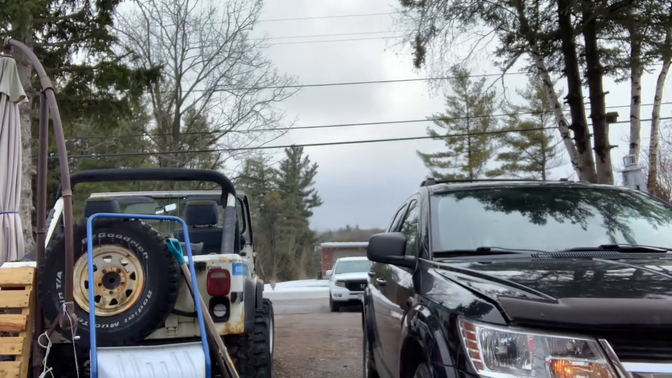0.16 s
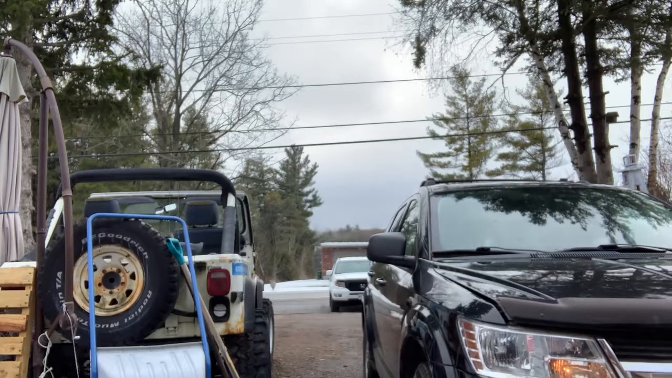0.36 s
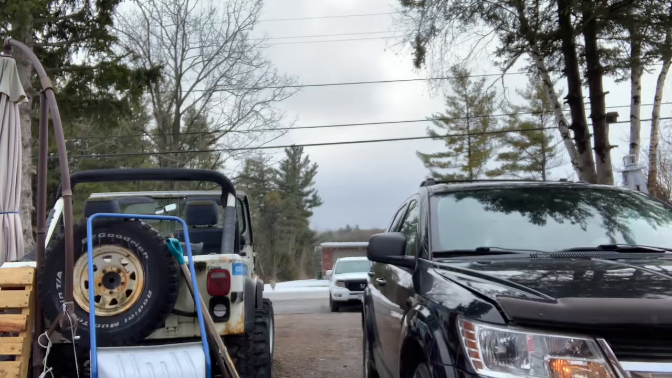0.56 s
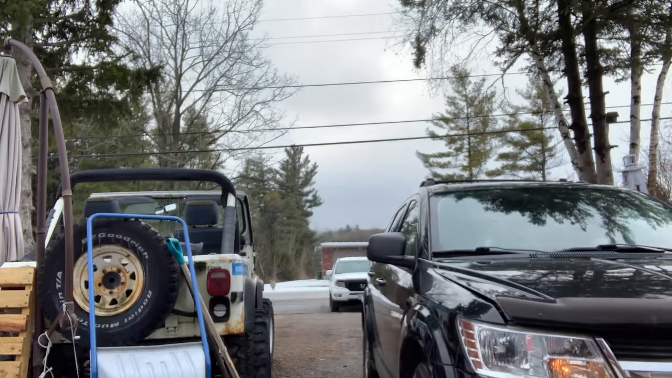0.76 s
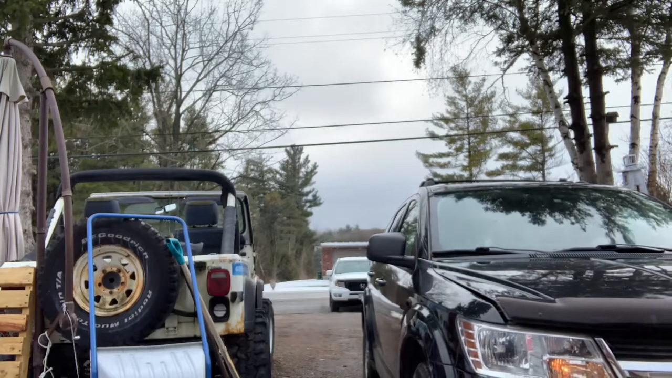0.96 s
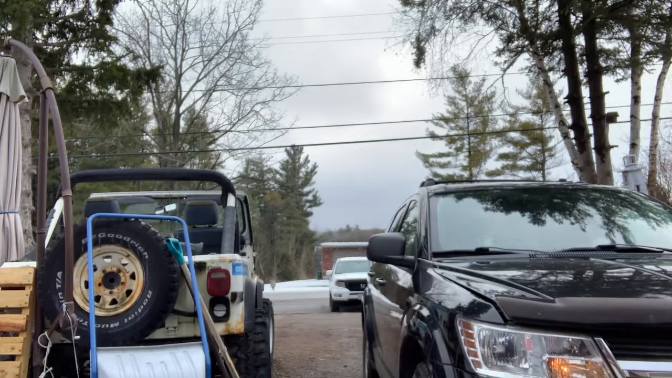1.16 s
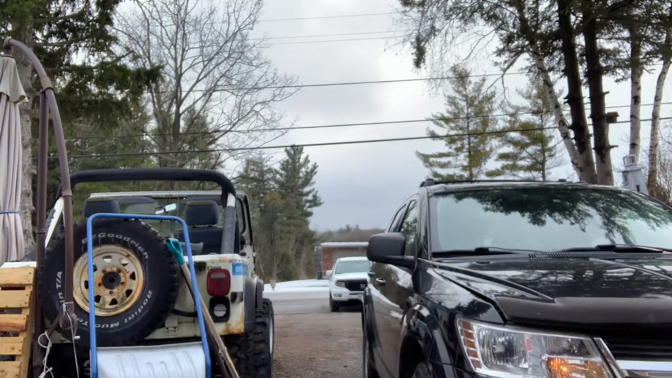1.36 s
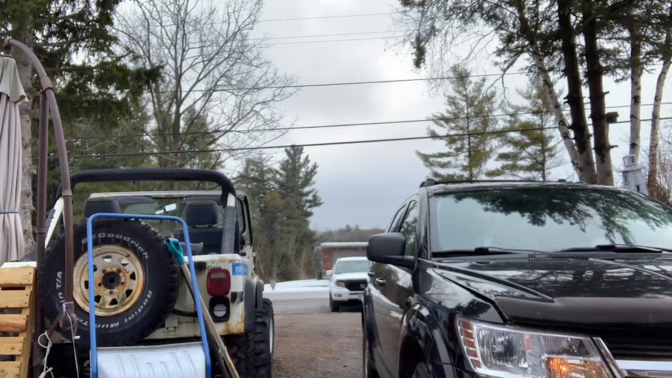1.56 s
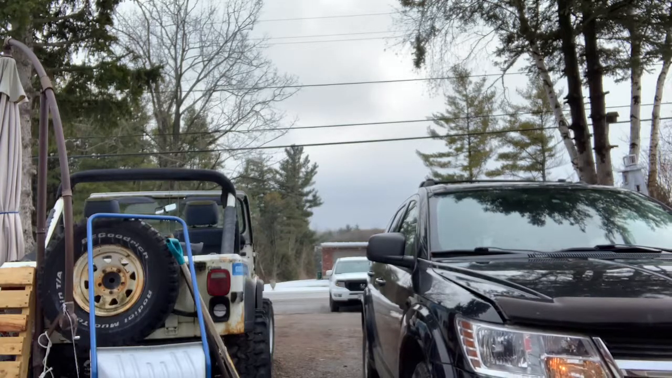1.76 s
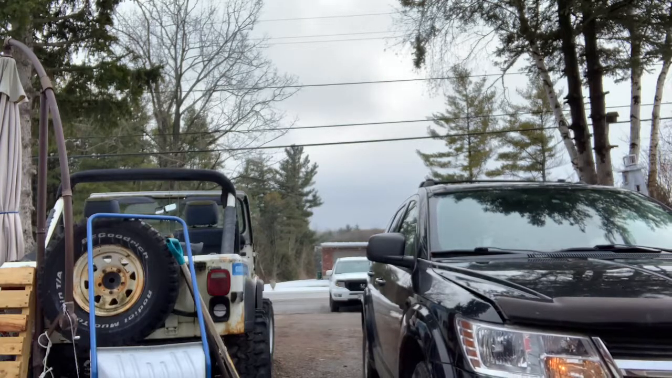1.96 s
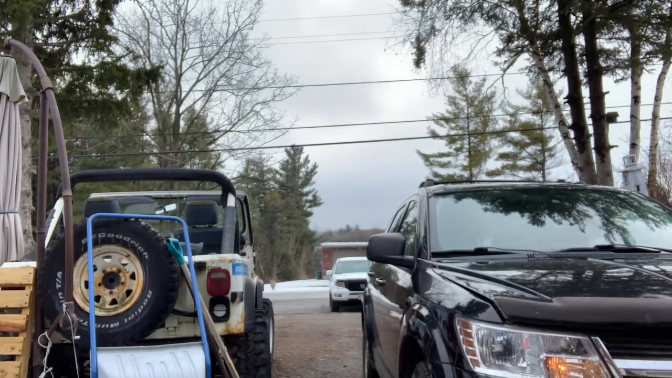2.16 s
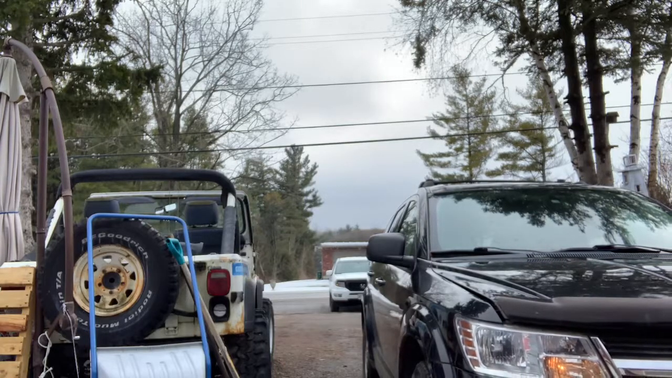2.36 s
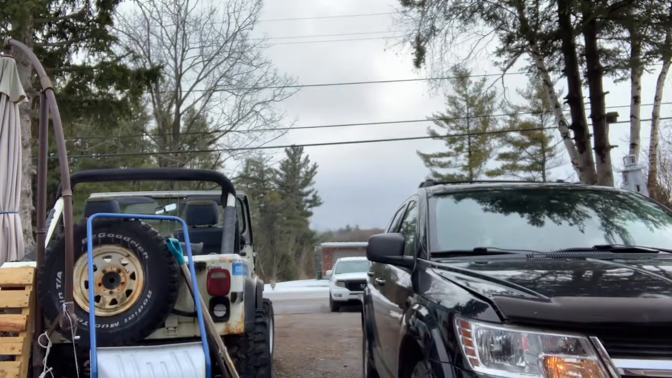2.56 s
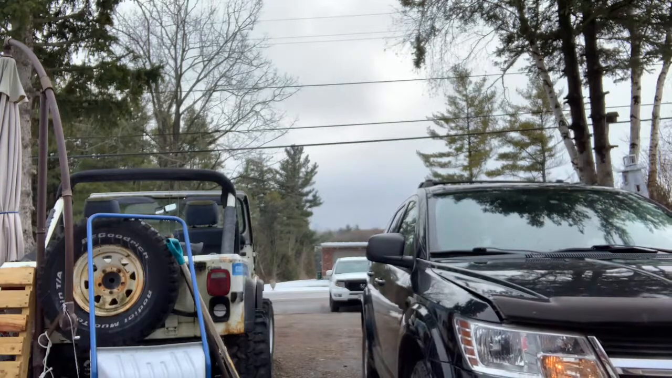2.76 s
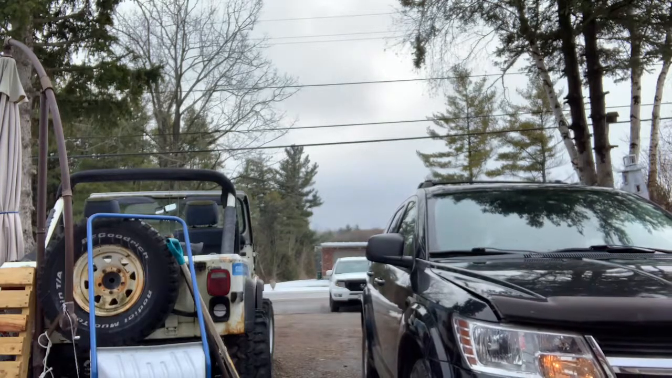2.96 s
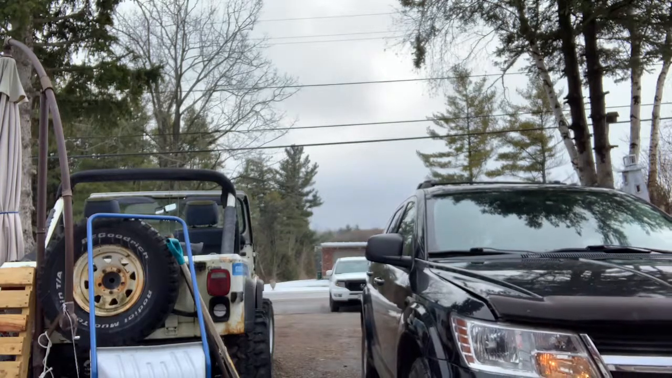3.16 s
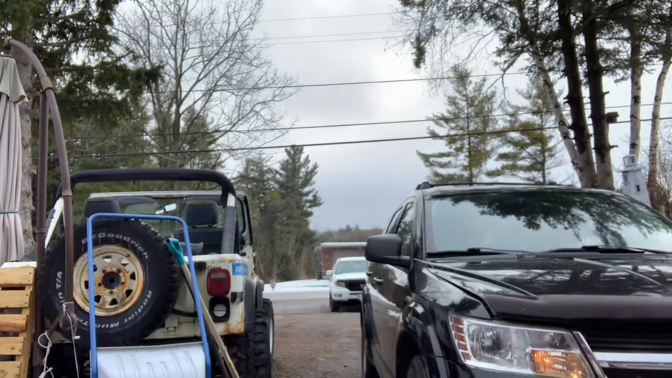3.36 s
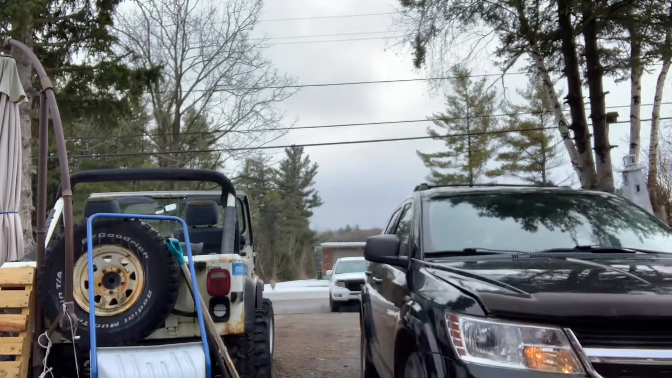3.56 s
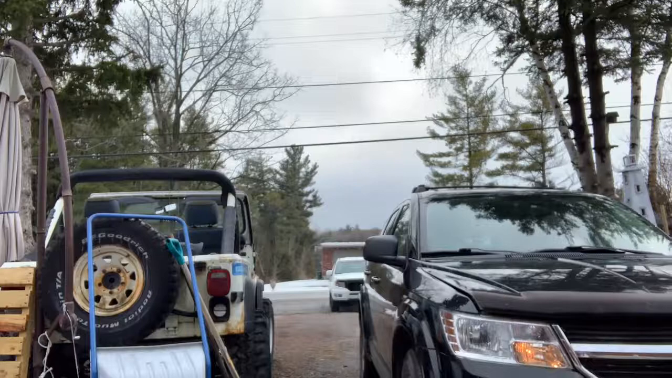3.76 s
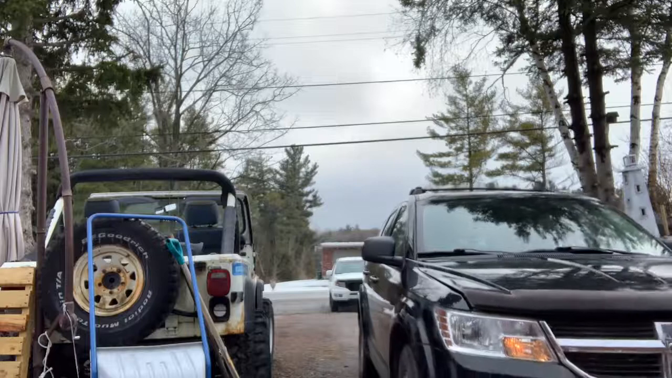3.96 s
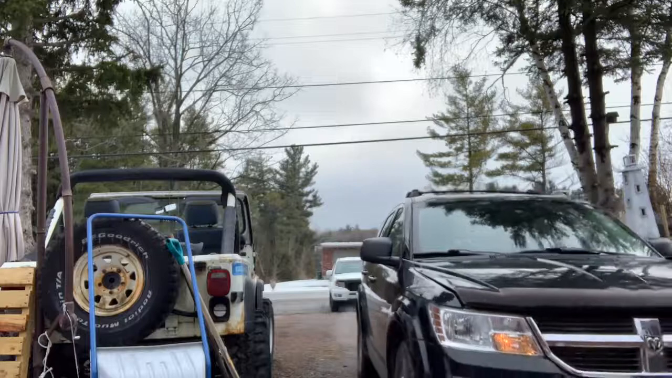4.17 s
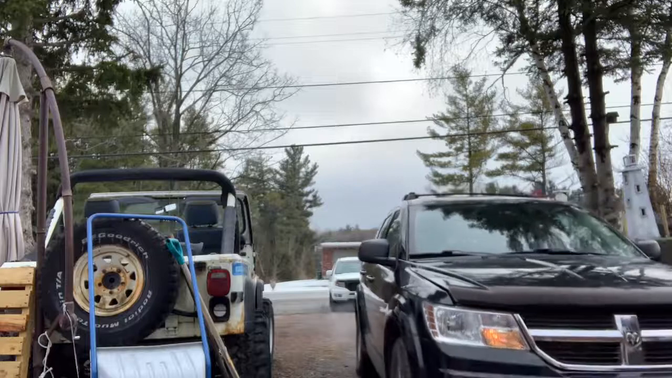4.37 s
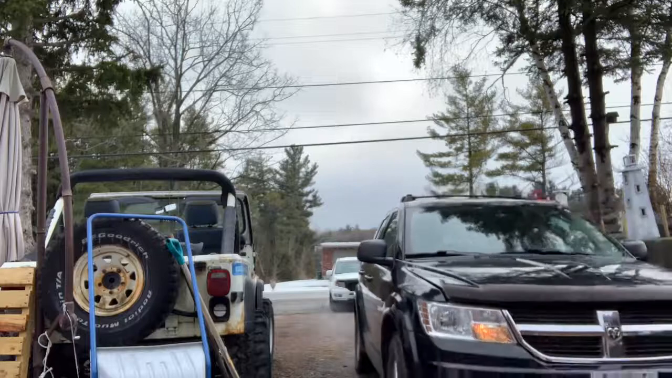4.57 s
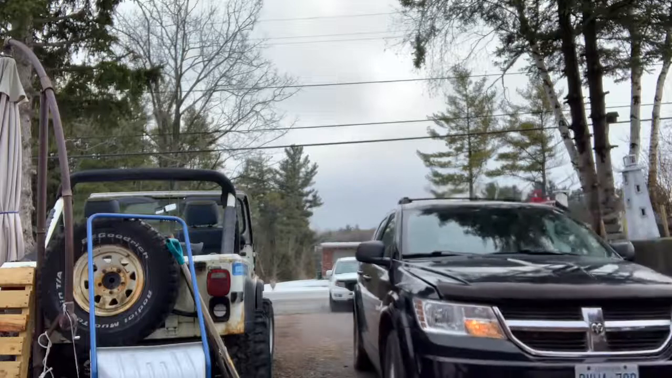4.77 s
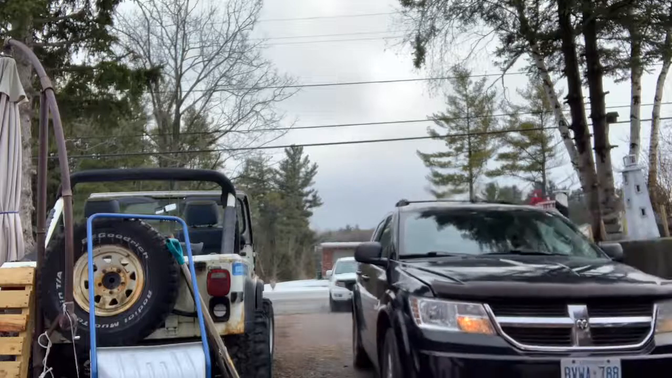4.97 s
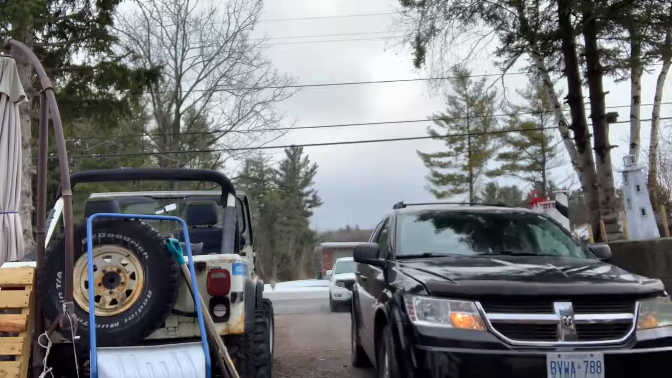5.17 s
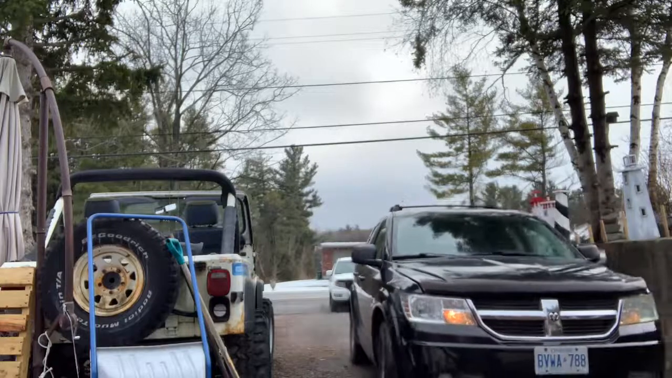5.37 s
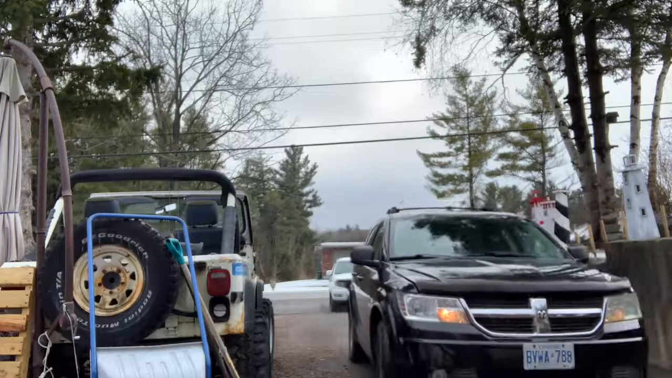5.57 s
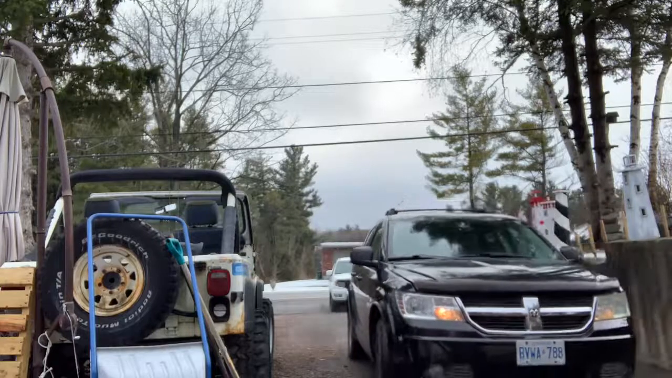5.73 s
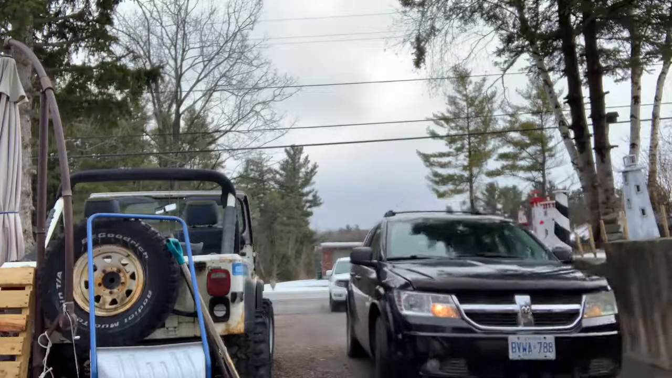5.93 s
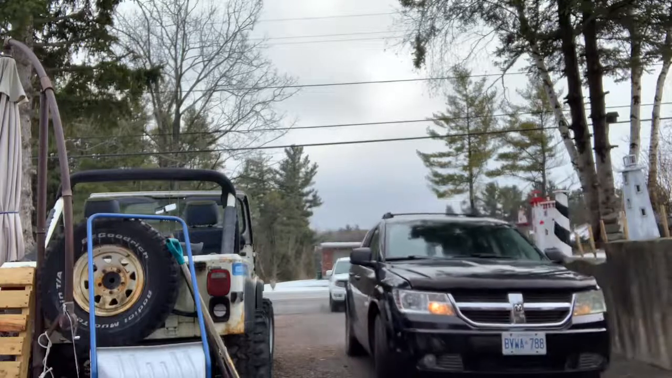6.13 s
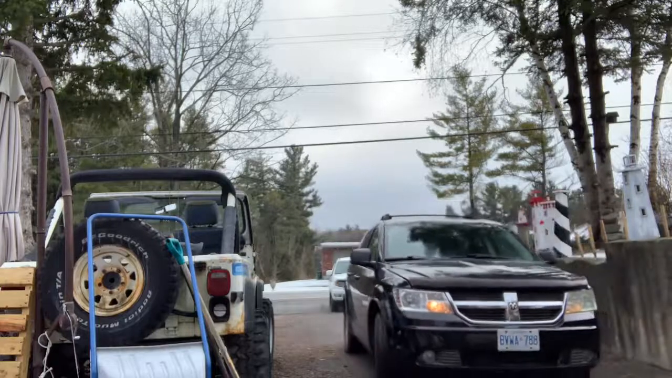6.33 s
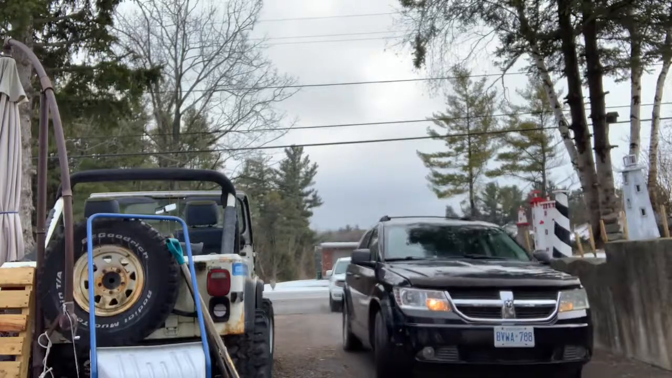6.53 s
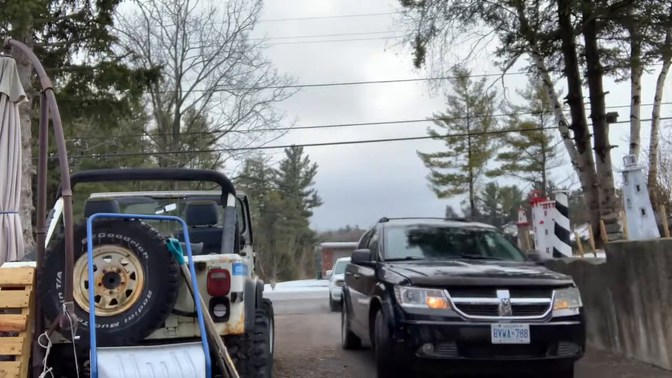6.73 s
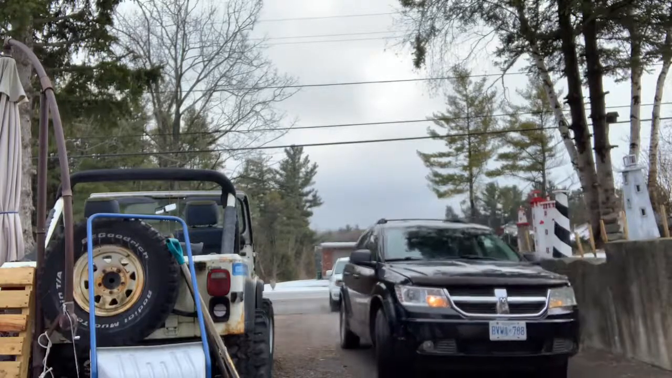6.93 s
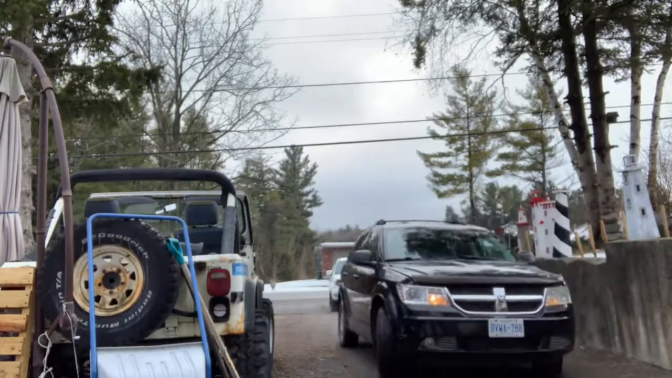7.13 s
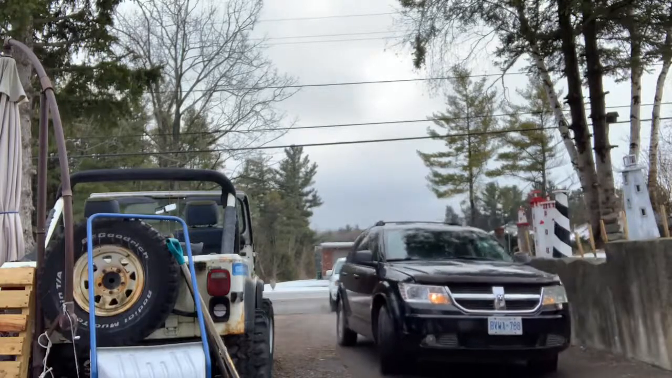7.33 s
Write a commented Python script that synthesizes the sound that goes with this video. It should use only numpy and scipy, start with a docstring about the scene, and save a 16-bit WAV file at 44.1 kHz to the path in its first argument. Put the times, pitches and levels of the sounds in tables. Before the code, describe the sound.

Outdoors on a gravel driveway, a nearby car engine idles from 0 to about 2.3 seconds. Its low firing hum is lumpy, briefly swelling and dipping, beneath a dominant broad rush of fan and valve gear and a fine belt hiss; faint narrow hums drift in and out. From about 2.3 seconds the revs climb smoothly, peaking near 3.6 with a fuller, brighter hum and a soft pulley whine, then fall by 4.5. The car begins backing away around 2.6, adding uneven tread noise and tiny gravel crunches. A smaller engine push comes near 4.9, with sharper stone snaps and scrapes around 5.2 and 5.5. The revs settle to idle by 6 seconds as the car recedes, hiss softening; weaker stone ticks come near 6.3. Faint wind swells slightly near 6.6 and eases before the end at about 7.4 seconds.

```python
"""A six-cylinder car idles unevenly on a gravel driveway: firing tones hum through pipe resonances,
while noise from fan, valve gear and belts rushes and hisses, and narrow hums come and go in faint wind.
It revs up and starts to back away from 2.6 s, with tread noise and bursts for small crunching stones.
A smaller push follows at about 4.9 s, near larger stone pops that snap, scrape and ring.
The revs then settle to idle as the car recedes, and the wind swells a little and eases at the end."""
import sys
import numpy as np
from scipy import signal
from scipy.fft import rfft, irfft, next_fast_len
from scipy.io import wavfile
from scipy.ndimage import map_coordinates

SR = 44100
rng = np.random.default_rng(int(sys.argv[2]) if len(sys.argv) > 2 else 0)


def pcm_store(signal):
    """Save signal as 16-bit PCM."""
    levels = np.round(np.clip(np.atleast_2d(signal), -1, 1) * 32767)
    wavfile.write(sys.argv[1], SR, levels.astype(np.int16).T)


N = 326340

# crankshaft: idle, a rev, a small second push, idle again: (time [s], speed [turns/s])
CRANK_SPEED = [(0.0, 21.0), (0.49, 20.3), (1.13, 21.7), (2.02, 22.2), (2.29, 24.0), (2.74, 28.3),
               (2.92, 30.5), (3.32, 38.3), (3.56, 41.0), (3.81, 40.6), (4.0, 36.0), (4.22, 29.7),
               (4.45, 25.4), (4.9, 28.0), (5.21, 26.1), (5.48, 23.1), (6.02, 20.7), (6.49, 20.7),
               (6.84, 22.0), (7.4, 22.2)]
IDLE_TURNS_PER_S = 21
# accelerator: (middle of press [s], middle of release [s], depth if held long enough [0-1])
PRESSES = [(2.546, 3.875, 0.93), (4.5, 5.1, 0.95)]
PEDAL_S = 0.8  # time for a full pedal movement
# the car starts to roll, gathers pace, then backs away steadily
ROLL_START_S, ROLL_RAMP_S, PACE_M_PER_S = 2.6, 1.8, 1.0

# how engine sounds change, before finer changes: (base level at idle [dB],
# rise per doubling of engine speed [dB], change per metre away [dB], change with pedal fully down [dB])
EXHAUST_LAW = (-49.5, 10, -2.5, 5)
RUSH_LAW = (-42.5, 3.5, -0.81, 2.5)
HISS_LAW = (-49, 7.5, -2.0, 1.5)
PULLEY_LAW = (-58, 9.5, -0.3, -2)

# exhaust tones: (multiple of crankshaft speed, relative level [dB], change with pedal fully down [dB])
EXHAUST_TONES = [(1.0, -1.5, -1.5), (2.0, 3.5, 3), (3.0, -0.95, 2), (4.0, 0.5, -1.5), (5.0, 2.5, -5.5),
                 (6.0, -3, 6.5), (7.0, -4.5, 4), (8.0, -2, 2), (12, -3, -1)]
# gain of pipe and underbody: (frequency [Hz], gain [dB])
PIPE_GAIN = [(21.0, -14), (26, -4.5), (33.0, -1.5), (45.0, -11.5), (54, -14.5), (62, -0.5), (71.0, -2),
             (81.0, -12), (89, -7.5), (103.0, -15.5), (114.0, -4.5), (123.0, -3), (133, -1.5), (145.0, -18),
             (157, -5.5), (166.0, 0), (176, -3.5), (190.0, -18), (240.0, -17), (290.0, -22.5), (380.0, -18),
             (480, -43)]
# swells and lulls of the firing tone: (time [s], change [dB])
THROBS = [(.03, 10.5), (.42, 8), (.56, 10), (.72, -2), (.92, 5), (1.1, -8), (1.28, 4), (1.45, -8),
          (1.59, 8), (1.8, -10), (1.98, 12.5), (2.15, -12), (2.31, 12), (5.25, -12), (5.38, 3), (5.58, -6),
          (5.89, -10), (6.38, 2), (6.55, -6), (7.1, -12)]
THROB_S = 0.047  # from the middle of a throb until its dB change falls to 37%
ROUGH_DB = 1.0  # unevenness of the exhaust tones
FIRING_CLEAR_DB, CLEAR_M = 13.5, 2.7  # the firing tone stands out as the car comes clear of its place
# colour of the gas rumble: (frequency [Hz], relative level per Hz [dB])
RUMBLE_COLOUR = [(20, -34), (32, -26), (45, -6), (65, 2), (95, -4.5), (125, -6), (175, -5), (215, -11.5),
                 (290, -20.5), (600, -49)]
RUMBLE_DB_PER_M = -0.6  # it fades as the car backs away

# colour of the engine-bay rush: (frequency [Hz], relative level per Hz [dB])
RUSH_COLOUR = [(100, -9.5), (250, -6), (320, -5.5), (385, -2), (480, 1), (680, 2), (850, -5.5), (1200, -4),
               (1450, -6), (2000, -4.5), (2250, -8.5), (2700, -10.5), (3200, -12.5), (6000, -31)]
# colour of the engine-bay hiss: (frequency [Hz], relative level per Hz [dB])
HISS_COLOUR = [(1200, -41), (2400, 0), (3200, -2), (4200, 1.5), (5500, -2), (7500, -4), (11000, -8),
               (13000, -15.5), (15500, -18.5)]
BRIGHTEN_DB, BRIGHTEN_HZ = 2.5, 750  # extra growth of the upper rush per doubling of speed
# main hollow resonance of the engine bay: (time [s], centre [Hz], lift [dB])
MAIN_HOLLOW = [(0, 570, 4), (2.4, 575, 5), (2.95, 598, 8.5), (3.4, 533, 1.5), (4.3, 510, 7),
               (4.75, 505, 2.5), (5.35, 510, 6), (5.7, 460, 8), (7.4, 445, 7)]
MAIN_WIDTH_HZ = 77
# shifting resonances: (parked centre [Hz], far centre [Hz], parked lift [dB], far lift [dB],
# width [Hz], distance for most of the shift [m])
HOLLOWS = [(1250, 960, 2.5, 5.5, 150, 2), (1820, 1586, 6, 10, 105, 0.36), (2030, 2015, 2.5, 8.5, 69, 2.2),
           (2500, 2480, 3, 1.5, 98, 1.0), (4110, 3970, 3, 1, 110, 1.0), (4850, 4650, 3, -1.5, 98, 1.0)]
# copies from ground and parked cars: (delay at the start [s], delay at the end [s], gain [dB])
ECHOES = [(.0075, .0092, -18.5), (0.0137, .0112, -15.5), (.023, .026, -16)]
PULLEY_MULTIPLE = 19  # pulley tone cycles per crankshaft turn
# narrow hums at idle: (middle of fade-in [s], middle of fade-out [s], frequency [Hz], level before waver [dB])
HUMS = [(0, .8, 382.4, -57.5), (.09, .4, 555, -49), (.36, 0.518, 535, -49), (.58, 1.02, 547, -54.5),
        (1.15, 1.75, 463, -57.5), (1.28, 2.1, 371, -55), (1.36, 1.56, 545, -50.5), (1.65, 1.95, 579, -51.5),
        (2.18, 2.36, 469, -48.5), (2.2, 2.48, 554, -54)]
HUM_FADE_S, HUM_WAVER_DB = 0.094, 2

# strength of the breeze before its random drift: (time [s], level [dB])
BREEZE = [(0, -58.5), (6.6, -55.5), (7.2, -62)]
# colour of the wind: (frequency [Hz], relative level per Hz [dB])
WIND_COLOUR = [(14, -16), (24, 0), (36, 9), (200, -6.5), (1000, -4), (3000, -19), (7000, -27), (11000, -10),
               (15500, -33)]
# colour of tread on grit: (frequency [Hz], relative level per Hz [dB])
TREAD_COLOUR = [(80, -21), (180, 7), (260, -13), (340, -0.5), (550, -0.5), (920, -0.5), (1300, -7.5),
                (1600, -11.5), (2300, -10), (6000, -26)]
TYRE_DB, TYRE_DB_PER_M = -43, -1.94  # level at full pace beside the parking place; change with distance
# stones under the tyres: (time [s], peak before the shared pop gain [dB], pitch [Hz],
# time to fade by 60 dB [s], width as a share of the pitch, length of the scrape [s])
STONES = [(4.445, -37.5, 1600, .04, .08, .004), (4.724, -38.5, 1550, .03, .1, .003),
          (5.014, -38, 1750, .04, .4, .012), (5.159, -32.5, 950, .06, 1.2, 0.017),
          (5.163, -32, 1060, .03, .07, .013), (5.176, -34, 620, .04, .5, 0.0055),
          (5.482, -28, 1300, .018, .9, 0), (5.484, -36, 1450, .12, .45, .002),
          (6.307, -37.5, 950, .05, 1.0, .008), (6.328, -39, 515, 0.053, 0.35, 0.0027),
          (6.378, -42, 900, .04, .8, 0.00034), (6.402, -41, 1580, .04, .2, 0)]

# likeness of left and right: (frequency [Hz], likeness [0-1])
ALIKE = [(150, 0.92), (280, 0.87), (380, 0.18), (520, 0.88), (750, 0.62), (1050, 0.22), (1800, 0.55),
         (3200, 0.14), (6300, 0.098), (8200, 1), (10000, 1), (11500, 0.059), (13000, 1)]
# stereo balance: (frequency [Hz], left minus right [dB])
BALANCE = [(30, -0.5), (150, -5.5), (250, 0), (370, -8.5), (700, -6.5), (900, -5), (1250, -5.5),
           (1750, -1.5), (2000, -3), (2900, -3.5), (3600, -.5), (7000, -0.5)]
# stereo phase: (frequency [Hz], lead of left over right [radians])
LEAD = [(30, 0.57), (120, 0.36), (220, -0.16), (300, -2.5), (480, -0.45), (800, -3.5), (1200, -8),
        (1600, -8), (2700, -8.5), (4000, -11), (6000, -11), (8000, -9.5), (10200, -9.5), (12700, -6.5)]
TOP_HZ = 15800


def amp(db):
    """Turns decibels into a multiplier."""
    return 10 ** (np.asarray(db) / 20)


def unit(x):
    """Scales x to an average strength (rms) of 1."""
    return x / np.sqrt(np.mean(x ** 2) + 1e-20)


def along(points, hz):
    """Reads a curve of (frequency, value) points on a log frequency axis."""
    f, v = np.transpose(points)
    return np.interp(np.log(hz + 1), np.log(f + 1), v)


def curves(rows):
    """Gives one value per sample for each column after the time."""
    s, *cols = np.transpose(rows)
    return [np.interp(np.arange(N) / SR, s, c) for c in cols]


def wobble(rate):
    """Draws a smooth random curve through the given number of random points a second."""
    points = rng.standard_normal(int(N * rate / SR) + 4)
    return map_coordinates(points, [np.arange(N) * rate / SR])


def filtered(x, response):
    """Multiplies the spectrum of x by a response, which may be complex."""
    size = next_fast_len(N + SR // 2)
    return irfft(rfft(x, size) * response(np.fft.rfftfreq(size, 1 / SR)), size)[..., :N]


def coloured(x, spectrum):
    """Shapes x by a gain curve and sets its rms to 1."""
    return unit(filtered(x, lambda hz: amp(along(spectrum, hz))))


def noise():
    """Makes white noise in two rows: direct and scattered sound."""
    return rng.standard_normal((2, N))


def tone(cycles):
    """Makes a sine of rms 1 that starts anywhere in its cycle."""
    return np.sqrt(2) * np.sin(2 * np.pi * (cycles + rng.random()))


def direct_only(x):
    """Places a sound in the direct row and leaves the scattered row silent."""
    return np.array([x, np.zeros(N)])


def pedal():
    """Tells how far the accelerator is down, 0-1; a short press may not reach its full depth."""
    t = np.arange(N) / SR
    return sum(depth * np.clip(.5 + np.minimum(t - down, up - t) / PEDAL_S, 0, 1)
               for down, up, depth in PRESSES)


def motion():
    """Gives the car's share of its full pace, and the metres it has backed away."""
    pace = np.clip((np.arange(N) / SR - ROLL_START_S) / ROLL_RAMP_S, 0, 1)
    return pace, PACE_M_PER_S * np.cumsum(pace) / SR


def level(law, speed):
    """Finds the dB of an engine sound from revs, pedal and distance."""
    idle_db, per_doubling_db, per_metre_db, pedal_db = law
    revs_db = per_doubling_db * np.log2(speed / IDLE_TURNS_PER_S)
    return idle_db + revs_db + per_metre_db * motion()[1] + pedal_db * pedal()


def throbs():
    """Gives the dB by which the firing tone briefly swells or drops away."""
    t = np.arange(N) / SR
    return sum(db * np.exp(-((t - s) / THROB_S) ** 2) for s, db in THROBS)


def exhaust(speed, turns, rumble_db, rumble_growth):
    """Three firings a turn drive a tone; unequal cylinders add others that sweep through pipe resonances."""
    load_db = level(EXHAUST_LAW, speed)
    metres = motion()[1]
    firing_db = FIRING_CLEAR_DB * np.clip(metres / CLEAR_M, 0, 1) + throbs()
    pressed = pedal()
    hum = np.zeros(N)
    for multiple, db, pedal_db in EXHAUST_TONES:
        level_db = load_db + db + pedal_db * pressed + along(PIPE_GAIN, multiple * speed)
        if multiple == 3:  # the firing tone
            level_db = level_db + firing_db
        hum += amp(level_db + ROUGH_DB * wobble(8)) * tone(multiple * turns)
    # turbulent gas rumbles too, and grows more slowly than the tones
    gas_db = rumble_db + rumble_growth * (load_db - load_db.mean()) + RUMBLE_DB_PER_M * metres
    rumble = amp(gas_db + wobble(6.5)) * coloured(noise(), RUMBLE_COLOUR)
    return rumble + direct_only(hum)


def machinery(turns, repeat, beat):
    """White clatter: a share repeats with each two-turn engine cycle, and all of it throbs with the cycle."""
    cycle = rng.standard_normal((2, SR // 10))
    place = (turns / 2 % 1) * cycle.shape[1]
    repeating = cycle[:, place.astype(int) % cycle.shape[1]]
    throb = 1 + beat * (np.sin(np.pi * turns) + np.sin(2 * np.pi * turns))
    return throb * (np.sqrt(repeat) * repeating + np.sqrt(1 - repeat) * noise())


def hollow(x):
    """Lifts x around engine-bay resonances: the main one wanders, the others glide with distance."""
    hz, t, z = signal.stft(x, SR, nperseg=2048)
    metres = np.interp(t * SR, np.arange(N), motion()[1])

    def bell(centre, width):
        """A resonance's peak, with the given width at half its dB lift."""
        return 1 / (1 + (2 * (hz[:, None] - centre) / width) ** 2)

    s, main_hz, main_db = np.transpose(MAIN_HOLLOW)
    lift = np.interp(t, s, main_db) * bell(np.interp(t, s, main_hz), MAIN_WIDTH_HZ)
    for near_hz, far_hz, near_db, far_db, width_hz, shift_m in HOLLOWS:
        away = 1 - np.exp(-metres / shift_m)
        centre_hz = near_hz + (far_hz - near_hz) * away
        lift = lift + (near_db + (far_db - near_db) * away) * bell(centre_hz, width_hz)
    return signal.istft(z * amp(lift), SR, nperseg=2048)[1][:, :N]


def echoed(x):
    """Adds delayed reflections whose paths change once the car moves."""
    now = np.arange(N)
    metres = motion()[1]
    out = x.copy()
    for start, end, db in ECHOES:
        delay_s = start + (end - start) * metres / metres[-1]
        then = np.round(now - SR * delay_s).astype(int)
        out += amp(db) * x[:, np.clip(then, 0, N - 1)]
    return out


def engine_bay(speed, turns):
    """Fan and valve gear rush under the bonnet, brighter at speed; belts and intake hiss above them."""
    clatter = coloured(echoed(hollow(machinery(turns, repeat=0.27, beat=0.025))), RUSH_COLOUR)
    upper = filtered(clatter, lambda hz: hz ** 4 / (hz ** 4 + BRIGHTEN_HZ ** 4))
    brighten = amp(BRIGHTEN_DB * np.log2(speed / IDLE_TURNS_PER_S)) - 1
    clatter = clatter + brighten * upper
    rush = amp(level(RUSH_LAW, speed) + 0.69 * wobble(12)) * clatter
    fine = coloured(echoed(hollow(machinery(turns, repeat=0.27, beat=0.058))), HISS_COLOUR)
    hiss = amp(level(HISS_LAW, speed) + 0.59 * wobble(10)) * fine
    return rush + hiss


def whines(speed, turns, waver_db, drift):
    """A belt-driven pulley sings with the revs; at idle, narrow hums swell and fade in the engine bay."""
    t = np.arange(N) / SR
    out = amp(level(PULLEY_LAW, speed) + waver_db * wobble(5)) * tone(PULLEY_MULTIPLE * turns)
    for start, end, hz, db in HUMS:
        swell = np.clip(.5 + np.minimum(t - start, end - t) / HUM_FADE_S, 0, 1)
        drifting_cycles = hz * t + drift * wobble(10)
        out += swell * amp(db + HUM_WAVER_DB * wobble(11.9)) * tone(drifting_cycles)
    return direct_only(out)


def wind():
    """A light breeze in the trees: coloured noise drifts in strength and eases at the end."""
    breeze_db, = curves(BREEZE)
    return amp(breeze_db + 0.9 * wobble(0.9)) * coloured(noise(), WIND_COLOUR)


def tyres(lumpy_db):
    """The tread grinds unevenly over packed grit: louder with pace, fainter with distance."""
    pace, metres = motion()
    level_db = TYRE_DB + TYRE_DB_PER_M * metres + lumpy_db * wobble(30)
    return np.sqrt(pace) * amp(level_db) * coloured(noise(), TREAD_COLOUR)


def small_stones(crunch_db, spread_db, count):
    """Scatters small stones over the time the car rolls, fainter with distance, in the columns of STONES."""
    times = rng.uniform(ROLL_START_S, N / SR, count)
    far_db = TYRE_DB_PER_M * np.interp(times * SR, np.arange(N), motion()[1])
    peak_db = crunch_db + far_db + spread_db * rng.standard_normal(count)
    pitch_hz = 1400 * np.exp(0.44 * rng.standard_normal(count))
    fade_s, width, scrape_s = np.full(count, .02), np.full(count, .43), np.zeros(count)
    return np.column_stack([times, peak_db, pitch_hz, fade_s, width, scrape_s])


def gravel(pop_db, crunch_db, spread_db, snap, muffle_hz, count):
    """Each stone snaps, scrapes or fades at once, and rings around its pitch, muffled by the tyre."""
    small = small_stones(crunch_db, spread_db, count)
    t = np.arange(SR // 8) / SR
    hz = np.fft.rfftfreq(len(t), 1 / SR)
    # a steep low-pass
    tyre = 1 / (1 + 1j * np.sqrt(2) * hz / muffle_hz - (hz / muffle_hz) ** 2) ** 2
    out = np.zeros((2, N + SR))
    for s, db, pitch, t60, width, scrape_s in np.vstack([STONES, small]):
        fade = amp(-60 * np.maximum(t - scrape_s, 0) / max(t60, .002))
        burst = rng.standard_normal((2, len(t))) * fade
        burst[0, 0] += snap
        band = 1j * hz * pitch * width
        ring = band / (pitch ** 2 - hz ** 2 + band)
        pop = irfft(rfft(burst) * ring * tyre, len(t))
        start = round(s * SR)
        out[:, start:start + len(t)] += amp(db + pop_db) * pop / np.abs(pop).max()
    return out[:, :N]


def stereo_image(pair):
    """Mixes direct and scattered sound into left and right, with balance and phase set by frequency."""
    def turn(hz):
        """Mixing angle: likeness 1 leaves only direct sound."""
        return np.arccos(np.clip(along(ALIKE, hz), 0, 1)) / 2

    direct, scattered = filtered(pair, lambda hz: np.array([np.cos(turn(hz)), np.sin(turn(hz))]))
    side = np.array([[.5], [-.5]])  # half of each difference goes to either side
    return filtered(np.array([direct + scattered, direct - scattered]),
                    lambda hz: amp(side * along(BALANCE, hz)) * np.exp(1j * side * along(LEAD, hz)))


def scene():
    """One crankshaft drives the engine sounds; wind, tyres and stones join them in stereo."""
    speed, = curves(CRANK_SPEED)
    turns = np.cumsum(speed * (1 + .002 * wobble(9))) / SR
    pipe = exhaust(speed, turns, rumble_db=-47.5, rumble_growth=0.1)
    bay = engine_bay(speed, turns) + whines(speed, turns, waver_db=4.0, drift=0.14)
    breeze = wind()
    tread = tyres(lumpy_db=2.0)
    stones = gravel(pop_db=6.5, crunch_db=-43.5, spread_db=2.0, snap=11.0, muffle_hz=2200, count=160)
    return stereo_image(pipe + bay + breeze + tread + stones)


def record(dry):
    """Keeps only the frequencies below the top limit."""
    return filtered(dry, lambda hz: hz < TOP_HZ)


dry = scene()
out = record(dry)
pcm_store(out)
```